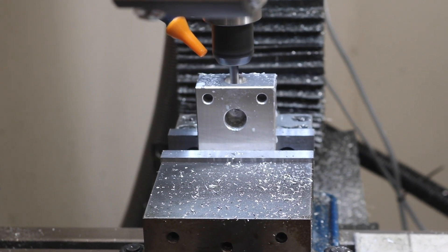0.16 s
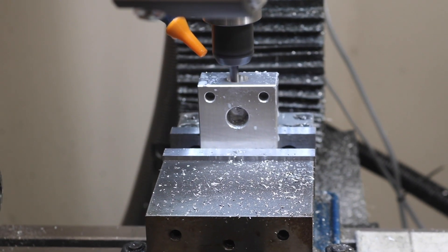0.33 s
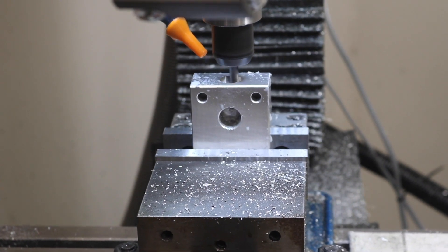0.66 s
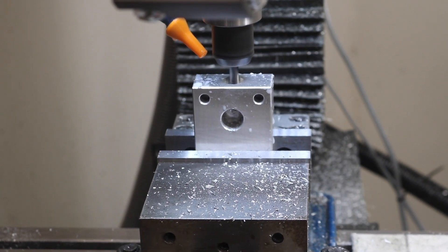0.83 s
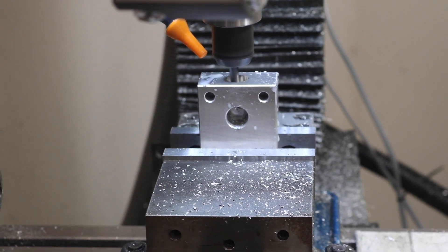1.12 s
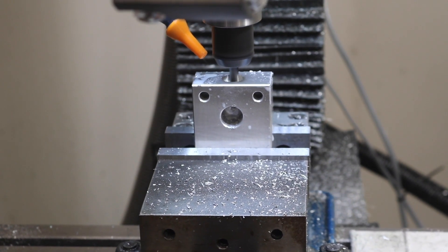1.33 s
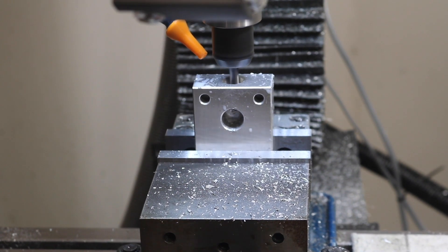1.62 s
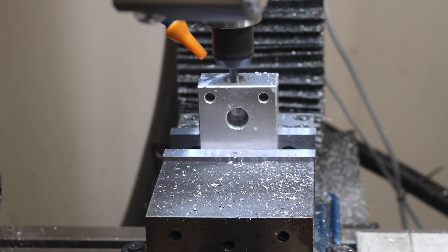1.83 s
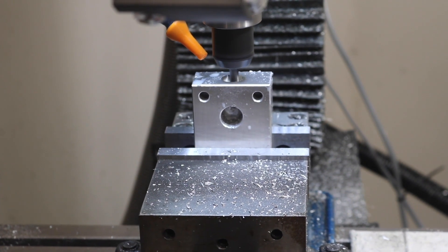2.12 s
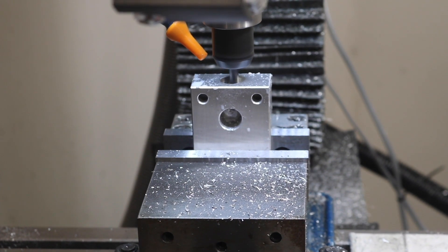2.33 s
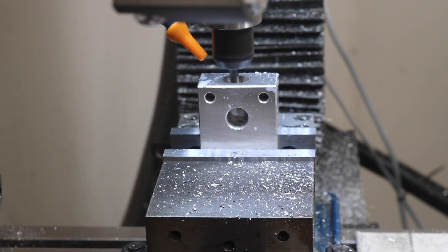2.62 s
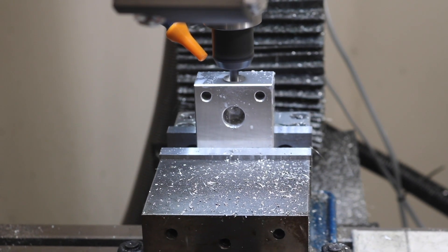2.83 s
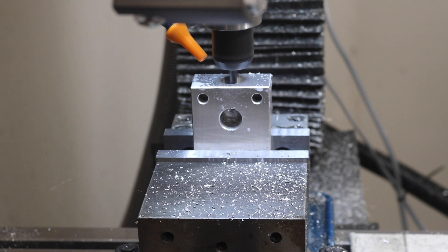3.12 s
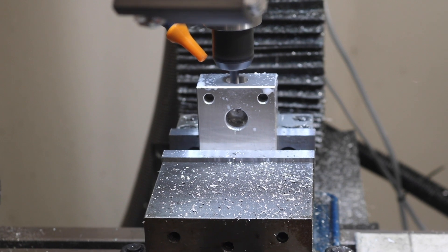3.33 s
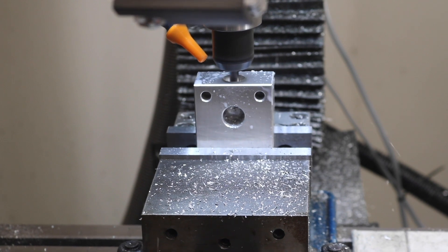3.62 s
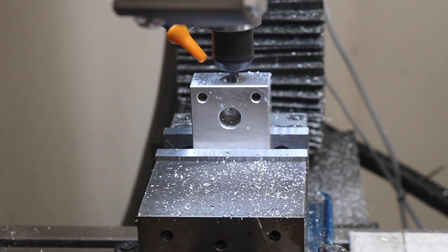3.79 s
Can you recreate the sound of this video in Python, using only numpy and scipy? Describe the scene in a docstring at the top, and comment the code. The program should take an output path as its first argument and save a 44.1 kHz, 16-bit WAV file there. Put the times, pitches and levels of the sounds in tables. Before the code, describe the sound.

A small milling machine cuts aluminium for about four seconds, with a steady, slightly fluttering spindle whine, a very high whistle and a bright hiss of air and chips. Two short, faint motor notes open the sound, and the cutter ticks against the metal at 0.1 seconds. From about 0.25 seconds to the end, the table motors chirp in turn, sweeping up and down roughly every 0.4 seconds.

```python
"""Small mill cutting aluminium

In a home workshop, a mono microphone hears a cutter circle down into a block. The belt-driven spindle
whines in a comb of tooth-rate overtones, and a fast rotor whistles high and sags under load. Two stepper
motors chirp in turn as the table runs round its circle; air and chips hiss over it all."""
import sys
import numpy as np
from scipy import signal
from scipy.fft import rfft, irfft, next_fast_len
from scipy.io import wavfile
from scipy.ndimage import uniform_filter1d, map_coordinates

SR = 44100
rng = np.random.default_rng(int(sys.argv[2]) if len(sys.argv) > 2 else 0)


def to_wav(sig):
    """Store sig (one row per channel, or 1-D mono) as 16-bit WAV at the path in sys.argv[1].

    Samples outside -1..1 are clipped; the rate is SR.
    """
    pcm = np.clip(np.atleast_2d(sig), -1, 1) * 32767
    pcm = np.round(pcm).astype(np.int16)
    wavfile.write(sys.argv[1], SR, pcm.T)  # frames by channels


N = 174195
T = np.arange(N) / SR


def spindle(tooth_phase, loud_db):
    """Teeth strike the metal in a comb of wavering overtones; runout adds a faint line above each."""
    # Quieter overtones, drifting as the cutter sinks: multiple, level_db, drift_db_per_s
    quiet_teeth = [(1, -73.5, 0), (2, -69.5, 0), (3, -79.5, 0), (4, -76.5, -1), (6, -79, 1.5),
                   (13, -70, 0.4), (14, -69.5, 0), (15, -77.5, -3), (16, -74, 0), (17, -72.5, -0.5),
                   (18, -67.5, .5), (19, -71, 0), (20, -70.5, 0), (21, -76, 0), (22, -71, -0.5),
                   (23, -83, -2.5), (24, -68.5, -0.5), (25, -77, 1.5), (26, -70, -2), (27, -73, -2.5),
                   (28, -82.5, 3.5), (29, -71.5, -5), (30, -71, -1), (31, -73.5, 1), (32, -75, -0.5),
                   (33, -77, 3.5)]
    # Loud overtones, one for each curve in loud_db: multiple
    loud_multiples = [5, 7, 8, 9, 10, 11, 12]
    teeth_per_turn, runout_db = 10, -28.5
    overtones = [(k, db + drift * (T - T.mean())) for k, db, drift in quiet_teeth]
    overtones += zip(loud_multiples, loud_db)
    out = 0
    for k, db in overtones:
        level_db = db + (.3 + .09 * k) * wobble(per_s=9)
        smear_rad = .36 * k ** 2 + .05 * k * rng.normal()  # spreads each pulse in time
        phase = k * tooth_phase + smear_rad + .016 * k * wobble(per_s=40)
        runout = tone(phase + tooth_phase / teeth_per_turn, level_db + runout_db)
        out += tone(phase, level_db) + runout
    return out


def rotor(rise_db):
    """High multiples of the fast rotor: a rough whistle that sags in pitch as the cut begins."""
    # Rotor speed under load: time_s, rate_hz
    speed = [(0, 370.1), (.15, 370.1), (.3, 369.6), (.5, 369.05), (.8, 368.85), (1.5, 368.65),
             (2.05, 368.6), (2.3, 368.3), (2.55, 368.45), (2.75, 368.05), (3.05, 368.25), (3.6, 368.25),
             (3.8, 368.05), (3.95, 368.1)]
    # Lines of the whistle: multiple, level_db
    partials = [(12, -86), (15, -81), (20, -82), (23, -82), (24, -79), (27, -77), (28, -82), (30, -79),
                (31, -77), (34, -81), (35, -74), (36, -65), (37, -57), (38, -66), (39, -69), (40, -76),
                (40.57, -69), (41, -68), (41.58, -73), (42, -65)]
    rotor_phase = turns(curves(speed)[0])
    gain_db = .3 + rise_db + .5 * (T - T.mean())  # grows as the cutter sinks
    out = 0
    for k, db in partials:
        phase = k * rotor_phase + .6 * k ** 2 + .28 * wobble(per_s=45)
        out += tone(phase, db + gain_db + .9 * wobble(per_s=13))
    return out


def steppers():
    """Each axis speeds and slows round the circle, sweeping its step tones through the frame's ring."""
    # Table motors: full_speed_s, direction_swing_db, braking_swing_db, [(multiple, level_db)]
    axes = [(.345, 4, 0, [(1, -73), (2, -95), (3, -85), (4, -82)]), (.545, 3, 2.5, [(1, -82), (2, -76.5),
            (3, -81.5), (4, -88), (10, -83)])]
    # Resonances of the frame: frequency_hz, gain_db
    frame = [(300, -45), (520, -28), (560, -19), (600, -10), (650, -19), (720, -21), (810, -18), (900, -32),
             (1300, -26), (1480, -11), (1620, 0), (1750, 3), (1900, -2), (2100, -12), (2430, 3), (2700, -9),
             (3150, 3), (3300, 2), (4000, -22)]
    start_s, lap_s, top_step_hz = .24, .7875, 810
    out = 0
    for full_speed_s, direction_db, braking_db, overtones in axes:
        angle = 2 * np.pi * (T - full_speed_s) / lap_s
        velocity = np.cos(angle)
        phase = turns(top_step_hz * np.abs(velocity))
        bright_db = direction_db * np.sign(velocity)  # upper overtones are louder one way
        steps = sum(tone(k * phase, db + (k > 1) * bright_db) for k, db in overtones)
        braking = np.sin(2 * angle)  # positive while the axis slows
        out += steps * amp(braking_db * braking + 2 * wobble(per_s=14))
    return filtered(out * (T > start_s), lambda hz: amp(along(frame, hz)))


def plunge():
    """The vertical motor sings two short, steady notes."""
    # Vertical moves: start_s, end_s, pitch_hz, level_db
    moves = [(0, 0.085, 1550, -75), (0.094, .25, 2035, -80)]
    fade_s = .013
    out = 0
    for start_s, end_s, hz, db in moves:
        envelope = np.clip(np.minimum(T - start_s, end_s - T) / fade_s, 0, 1)
        out += tone(2 * np.pi * hz * T, db) * envelope
    return out


def cutter_tick():
    """The cutter rings briefly as it touches the block."""
    # First contact: start_s, pitch_hz, level_db, t60_s
    contact = (.099, 4680, -54, .035)
    start_s, hz, db, t60_s = contact
    age_s = np.clip(T - start_s, 0, None)
    attack = 1 - np.exp(-age_s / .00067)
    return tone(2 * np.pi * hz * age_s, db - 60 * age_s / t60_s) * attack


def hiss(tooth_phase):
    """Air and chips hiss, partly pulsing with the teeth."""
    # Spectrum of air and chips: frequency_hz, density_db (power per hertz)
    spectrum = [(25, -137), (100, -135.5), (250, -129), (420, -121), (520, -128), (620, -131), (720, -128),
                (850, -119), (1150, -119), (1500, -110), (2000, -107), (2600, -108), (3100, -101),
                (4000, -103), (5000, -100), (5800, -96.5), (6100, -103), (7000, -99), (7600, -103),
                (9300, -95), (10100, -101), (11000, -99), (11800, -95), (12500, -100), (13000, -94.5),
                (13700, -91.5), (14500, -94.5), (15500, -94.5)]
    return noise(spectrum, patchy_db=1.2) * (1 + .22 * np.cos(tooth_phase))


def housing():
    """Faint tones of the housing come and go."""
    # Housing tones: pitch_hz, level_db
    hums = [(381, -99), (761.5, -102), (998, -102), (1524, -90), (1922, -97), (2051, -93.5), (2676, -90.5),
            (4398, -82.5), (5076, -81), (5259, -81), (5351, -80), (5550, -80.5), (5760, -86), (8005, -80),
            (9442, -79)]
    out = 0
    for hz, db in hums:
        phase = 2 * np.pi * hz * T + 2.3 * wobble(per_s=12)
        out += tone(phase, db + 3 * wobble(per_s=3.6))
    return out


def amp(db):
    """Decibels to amplitude."""
    return 10 ** (np.asarray(db) / 20)


def along(points, hz):
    """Interpolate (frequency_hz, value) points on a log frequency axis."""
    point_hz, values = np.transpose(points)
    return np.interp(np.log(hz + 1), np.log(point_hz + 1), values)


def curves(rows):
    """One value per sample for each column after the time."""
    time_s, *columns = np.transpose(rows)
    return [np.interp(T, time_s, column) for column in columns]


def wobble(per_s):
    """A smooth random curve with per_s knots a second."""
    knots = rng.standard_normal(400)
    coarse_s = T[::64]
    return np.interp(T, coarse_s, map_coordinates(knots, [coarse_s * per_s], mode="wrap"))


def filtered(x, response):
    """Filter x by a gain given as a function of frequency."""
    size = next_fast_len(N + SR // 2)
    gain = response(np.fft.rfftfreq(size, 1 / SR))
    return irfft(rfft(x, size) * gain, size)[..., :N]


def turns(hz):
    """Running phase in radians of a rate curve."""
    return 2 * np.pi * np.cumsum(hz) / SR


def tone(phase, db):
    """A sine of rms level db."""
    return np.sqrt(2) * amp(db) * np.sin(phase)


def noise(spectrum, patchy_db):
    """Noise at the given level per Hz, with patches of random gain."""
    cells = signal.stft(rng.standard_normal(N), nperseg=512)[2]
    patches = uniform_filter1d(rng.standard_normal(cells.shape), 6, axis=0)  # smooth in frequency
    patches = uniform_filter1d(patches, 10, axis=1)  # and in time
    patchy = signal.istft(cells * amp(patchy_db * patches / patches.std()), nperseg=512)[1][:N]
    return filtered(patchy, lambda hz: amp(along(spectrum, hz)) * np.sqrt(SR / 2))


def scene():
    """The machine swells and flutters as one through the cut; the hiss follows less deeply."""
    # Balance of the machine, whose tones trade places as the cutter circles and sinks:
    # time_s, machine_db, whistle_db (only its swing counts), seven overtone_db over the mean machine_db
    balance = [(0.0, -48.5, -15.5, -21, -24, -11.5, -21, -15.5, -16, -28),
               (0.13, -51, -16, -26, -18.5, -9, -1, -15.5, -27, -18),
               (0.21, -49.5, -13, -31.5, -20, -12.5, -12, -13, -9, -27.5),
               (0.3, -48.5, -11, -24.5, -22, -11.5, -7.5, -19.5, -16, -24.5),
               (0.45, -50, -11.5, -26, -15.5, -9.5, -7.5, -6.5, -18, -24),
               (0.51, -49.5, -8.5, -19.5, -19, -10, -7.5, -19.5, -12, -34),
               (0.64, -48.5, -12.5, -32, -19, -13.5, -8.5, -11.5, -19, -15),
               (0.69, -47, -15, -26, -17, -10.5, -13, -12, -19, -23),
               (0.79, -48.5, -15.5, -29, -23, -12, -13.5, -26.5, -23.5, -21),
               (0.85, -49, -14.5, -23, -20.5, -12, -14, -15, -18, -19),
               (1.02, -48.5, -9, -21.5, -17, -12.5, -10, -10.5, -21, -19),
               (1.2, -47, -13.5, -25, -21, -8.5, -10, -13, -16.5, -21),
               (1.36, -47, -16.5, -23.5, -17.5, -15, -13.5, -10.5, -17, -25),
               (1.51, -49, -15, -22.5, -22, -11.5, -19, -10.5, -18.5, -16),
               (1.64, -49, -14.5, -22.5, -14.5, -12, -21, -10.5, -24, -23),
               (1.72, -47, -5.5, -20.5, -15, -10.5, -14, -18, -21, -27),
               (1.78, -48, -15.5, -20, -13, -11, -17, -9, -24, -17),
               (1.89, -46.5, -10.5, -21.5, -18, -12, -17.5, -14, -27, -24),
               (1.98, -46.5, -10.5, -22.5, -12.5, -8, -13.5, -10, -16, -15),
               (2.21, -47, -12, -23, -17.5, -13.5, -19.5, -13.5, -18, -24),
               (2.38, -50, -10, -23.5, -13, -10.5, -15, -10.5, -20.5, -23),
               (2.52, -47.5, -13, -24.5, -15.5, -11, -20.5, -12.5, -22.5, -21),
               (2.86, -45.5, -11, -25, -15, -10, -16, -11.5, -19.5, -16.5),
               (2.99, -47, -12, -25.5, -14.5, -8, -21.5, -11.5, -26.5, -22),
               (3.28, -48, -13.5, -29, -16, -11, -22, -12.5, -25.5, -21),
               (3.57, -44, -12.5, -20.5, -15, -8.5, -21.5, -12.5, -18, -15.5),
               (3.81, -46.5, -10.5, -20.5, -17.5, -13.5, -22, -14, -21.5, -17),
               (3.9, -48.5, -9, -21.5, -11.5, -1.5, -19, -7.5, -30, -12),
               (3.95, -48, -14, -23, -20, -16, -21, -14, -19, -21)]
    # Pace of the spindle's teeth: time_s, rate_hz
    tooth_rate = [(0, 457.15), (.55, 457.05), (.85, 457.6), (1.2, 457.4), (1.6, 457.1), (1.85, 457.4),
                  (2.4, 457.35), (2.65, 457.1), (3.05, 457.65), (3.45, 457.25), (3.95, 457.15)]
    settle_s, hiss_share = .14, .69
    machine_db, *tones_db = curves(balance)
    mean_db = machine_db.mean()
    whistle_db, *overtones_db = uniform_filter1d(np.array(tones_db), round(settle_s * SR))
    tooth_phase = turns(curves(tooth_rate)[0])
    whine = spindle(tooth_phase, np.add(overtones_db, mean_db))
    drive = whine + rotor(whistle_db - whistle_db.mean()) + housing()
    swell_db = machine_db - mean_db + .45 * wobble(per_s=26)
    motors = amp(swell_db) * (drive + steppers() + plunge())
    mill = motors + amp(hiss_share * swell_db) * hiss(tooth_phase) + cutter_tick()
    return np.array([mill, mill])


def record(dry):
    """The microphone chain passes nothing above its band limit."""
    return filtered(dry, lambda hz: hz < 15730)


dry = scene()
out = record(dry)
to_wav(out)
```